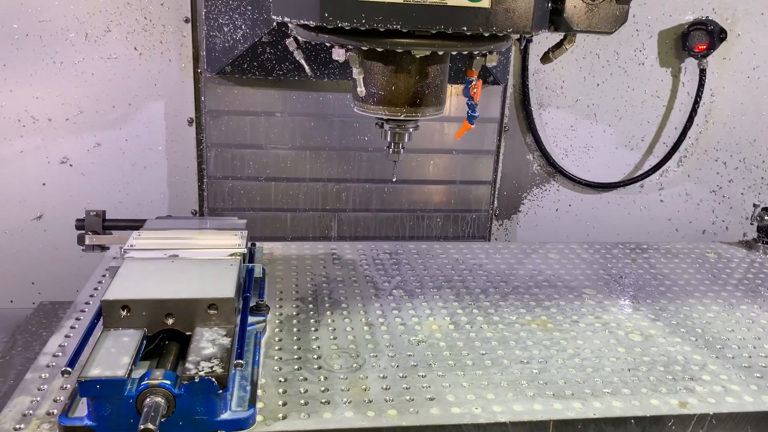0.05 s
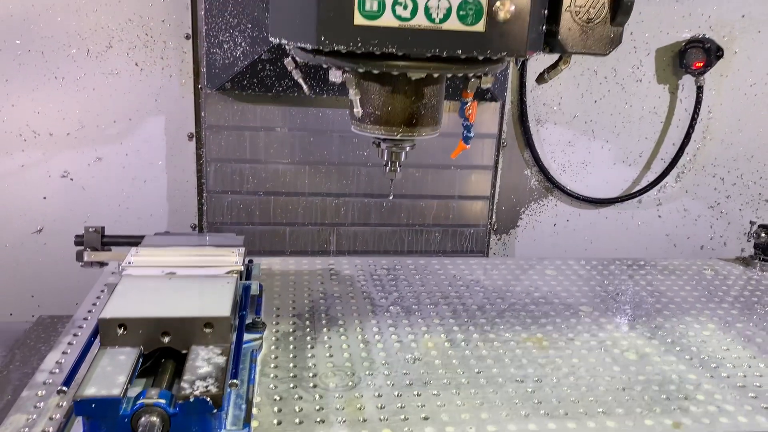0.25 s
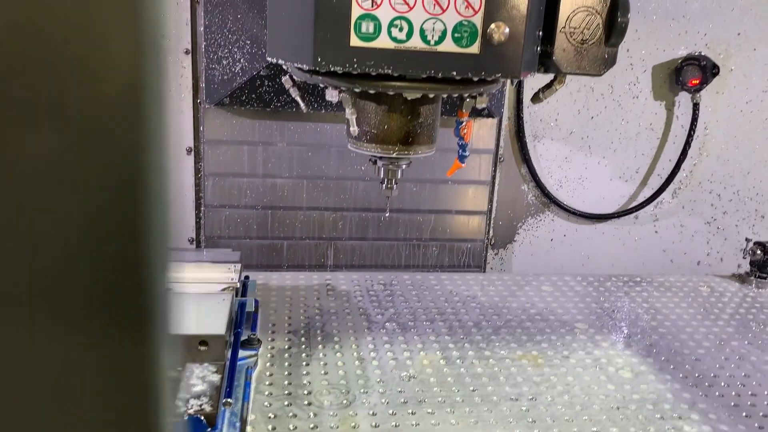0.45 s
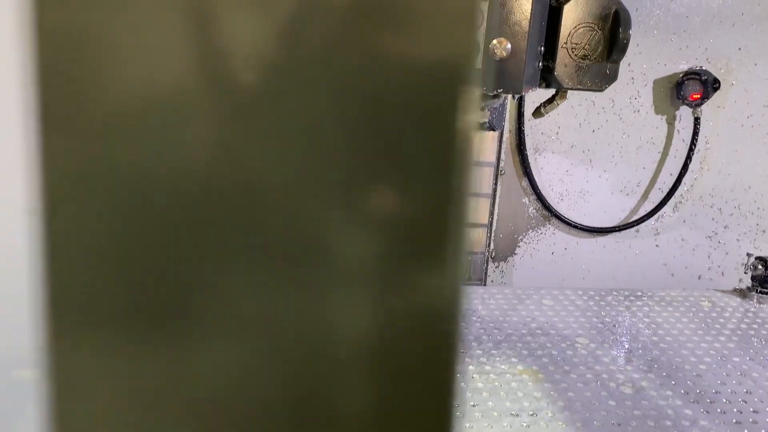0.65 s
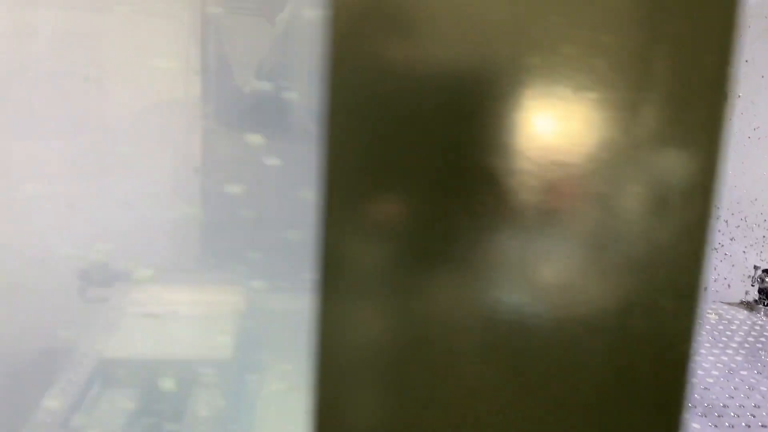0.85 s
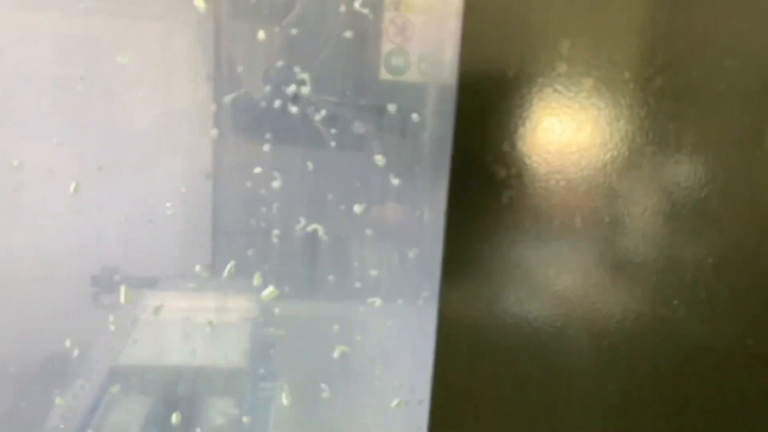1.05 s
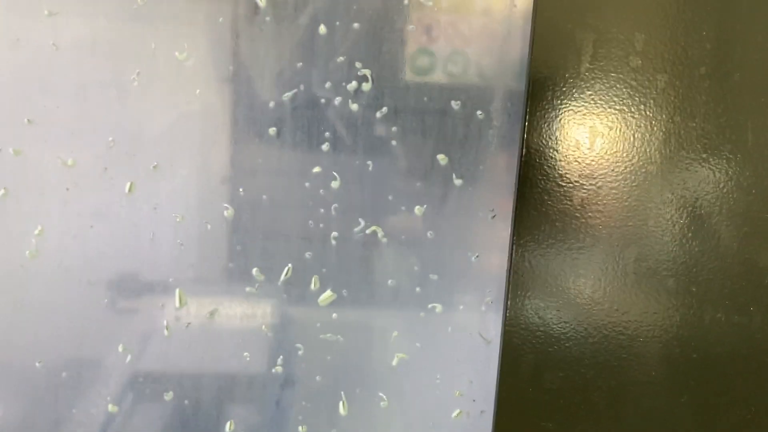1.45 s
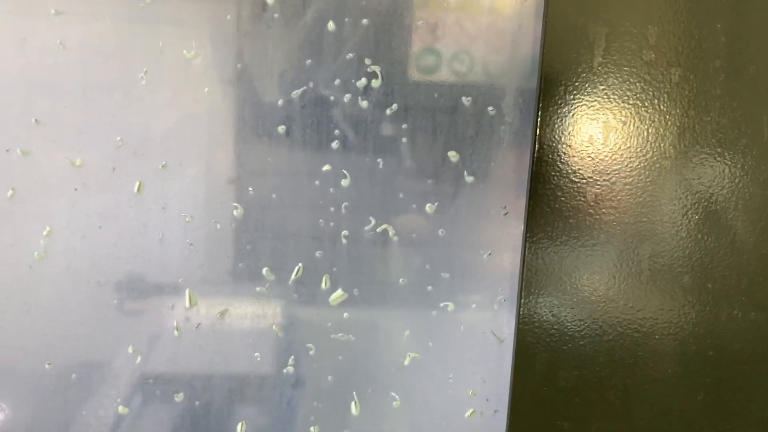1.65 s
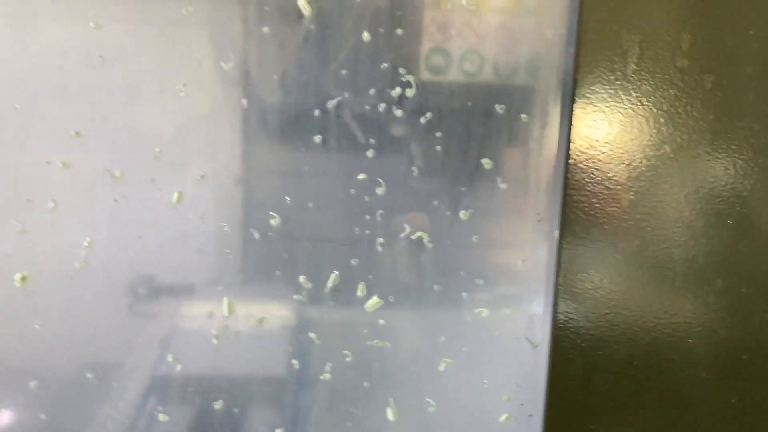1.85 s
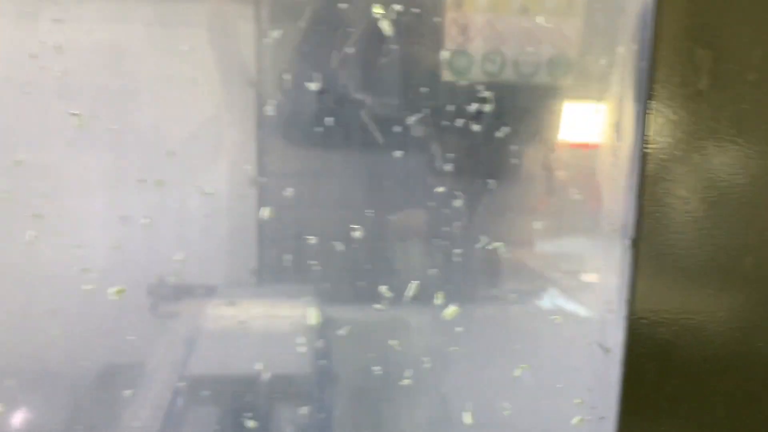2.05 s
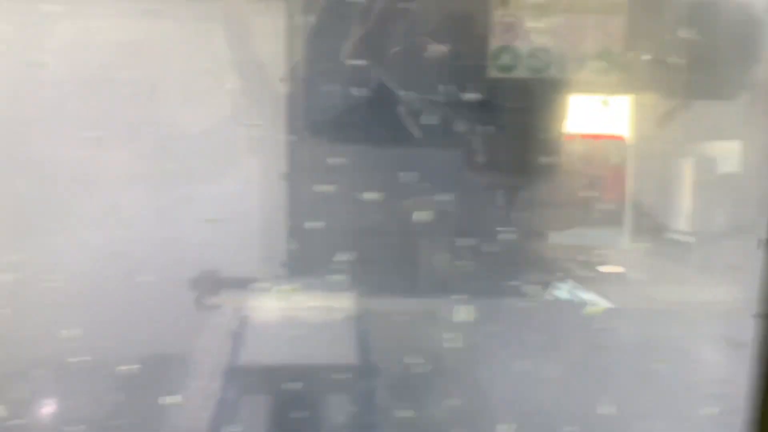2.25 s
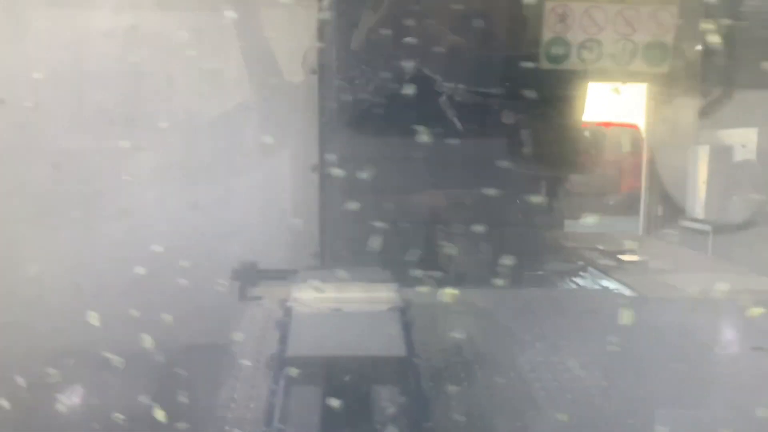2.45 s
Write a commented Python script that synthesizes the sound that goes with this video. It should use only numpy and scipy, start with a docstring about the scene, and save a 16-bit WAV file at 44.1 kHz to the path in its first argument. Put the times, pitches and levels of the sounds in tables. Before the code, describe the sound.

A heavy metal enclosure door rumbles along its track and thuds shut as a machine hums.

```python
"""A machine hums, and a soft thump sounds as the sheet-metal door of its enclosure is gripped.
The hum grows louder while the door rolls: grit and rough spots excite the frame, the enclosure
shudders, the panel flexes in falling tones, and steel clanks on steel. The door shuts with a knock,
a boom and a latch tick, then settles with a few soft thumps. Each impact rings the damped modes
of the body it strikes, and all is heard at a close pair of microphone ports."""
import sys
import numpy as np
from scipy import signal
from scipy.fft import rfft, irfft
from scipy.io import wavfile
from scipy.ndimage import uniform_filter1d

SR = 44100
rng = np.random.default_rng(int(sys.argv[2]) if len(sys.argv) > 2 else 0)


def unload_wav(signal):
    """Save mono or channel-first audio to the path in sys.argv[1] as 16-bit WAV at rate SR, clipped to [-1, 1]."""
    wavfile.write(
        sys.argv[1],
        SR,
        np.round(np.clip(np.atleast_2d(signal).T, -1, 1) * 32767).astype(np.int16),
    )


N = 110250
TIME, BINS = np.arange(N) / SR, np.arange(N // 2 + 1) * SR / N


def amp(db):
    """Amplitude grows tenfold for every 20 dB."""
    return 10 ** (np.asarray(db) / 20)


def at_hz(table, hz, column=1):
    """Interpolation of a table's column on a log-frequency axis."""
    table = np.array(table)
    return np.interp(np.log(hz + 1e-9), np.log(table[:, 0]), table[:, column])


def envelope(curve):
    """Gain over time, linear in decibels between points."""
    return amp(np.interp(TIME, *np.transpose(curve)))


def white():
    """Spectra of two uncorrelated white noises at 0 dB per Hz."""
    return rfft(rng.standard_normal((2, N))) * np.sqrt(SR / 2)


def noise(spectrum):
    """Spectral shaping colours two uncorrelated noises."""
    return irfft(white() * amp(at_hz(spectrum, BINS)), N)


def drift(rate_hz):
    """Low-passed noise gives a random fluctuation of unit variance."""
    slow = irfft(white()[0] / (1 + (BINS / rate_hz) ** 2), N)
    return slow / slow.std()


def impulses(rows):
    """A brief contact acts as an impulse: one for each time and level."""
    clicks = np.zeros(N)
    for s, db in rows:
        clicks[int(s * SR)] += amp(db)
    return clicks


def soften(force, hz):
    """A compliant contact acts as a low-pass filter."""
    return signal.sosfilt(signal.butter(2, min(hz, SR / 3), fs=SR, output="sos"), force + 1e-18)


def excite(force, response):
    """A linear body convolves the force with its impulse response."""
    return signal.fftconvolve(np.atleast_2d(force), np.atleast_2d(response), axes=1)[:, :N]


def modes(table):
    """Distinct modes superpose as damped sinusoids, each falling 60 dB in its T60."""
    t = TIME[:SR]
    return sum((-1) ** k * amp(db - 60 * t / t60) * np.sin(2 * np.pi * hz * t)
               for k, (hz, db, t60) in enumerate(table))


def modal_ripple(depth_db, width_hz=66):
    """Sheet metal responds with random peaks and valleys, at unchanged mean power."""
    span = max(int(width_hz * N / SR), 3)
    ripple = uniform_filter1d(uniform_filter1d(rng.standard_normal(len(BINS)), span), span)
    gain = amp(depth_db * np.clip(ripple / ripple.std(), -2, 1.5) * BINS / (BINS + 1200))
    return gain / np.sqrt(uniform_filter1d(gain ** 2, 10 * span))


def dense_modes(table, ripple_db=0, bands=12):
    """Overlapping modes merge into noise that decays band by band."""
    spectrum = white() * amp(at_hz(table, BINS)) * modal_ripple(ripple_db)
    centres = np.geomspace(40, 16000, bands)
    out = 0
    for hz, pick in zip(centres, np.eye(bands)):
        band = irfft(spectrum * np.interp(BINS, centres, pick), N)[:, :SR]
        out = out + band * amp(-60 * TIME[:SR] / at_hz(table, hz, column=2))
    return out


# Each row: frequency in Hz, rms level in dB before the swell, waver in Hz, share of the swell in dB.
HUM_TONES = [(475.4, -60.5, .9, .85), (571.3, -59.5, 0.65, .72), (633, -53.5, .6, 1.06),
             (1041, -69.5, 0.9, 1.18), (1540, -74, 9.7, 0.69), (1720, -79.5, 1.6, 1.05),
             (1873, -82, 2, 1.3)]
# Fans and pumps, thin hiss, rushing air. Each row: frequency in Hz, level in dB per Hz.
FAN_SPECTRUM = [(25, -90.5), (70, -78), (150, -99.5), (280, -101), (420, -94), (530, -81), (640, -87),
                (730, -96), (1300, -96.5), (1600, -88.5), (1950, -96), (2400, -116), (4500, -121),
                (6500, -113), (8000, -122)]
HISS_SPECTRUM = [(7600, -130), (8200, -93.5), (10000, -97.5), (12000, -102), (16000, -106)]
RUSH_SPECTRUM = [(25, -82), (85, -66), (170, -76.5), (280, -82.5), (500, -82), (1000, -87), (1800, -89),
                 (2800, -99), (6700, -99), (8500, -116), (12000, -135)]
# Each row: time in seconds, gain in dB.
HUM_SWELL = [(0, -6.5), (.12, 0.5), (.21, 1), (.34, 15.5), (1.28, 15), (1.295, 3), (1.47, -2), (2.08, 0),
             (2.14, -6.5), (2.33, 3.5), (2.5, 0)]
HISS_GAIN = [(0, 0.5), (.17, 2), (.19, 9.5), (.24, 9.5), (.33, 0), (1.006, 3.5), (1.3, -1), (1.6, 1.5),
             (2.5, 1)]
RUSH_GAIN = [(0, -10.5), (.1, -5), (.21, -4), (1.3, -9), (1.38, -34), (1.75, -35), (1.92, -12.5),
             (2.2, -32.5), (2.26, -5), (2.34, 2), (2.41, -2.5), (2.5, -6)]


def machine(waver_db=.77):
    """Tones, slightly modulated in pitch and level, superpose on the broadband noise of fans and air."""
    hum = 0
    for hz, db, waver_hz, share in HUM_TONES:
        phase = 2 * np.pi * np.cumsum(hz + waver_hz * drift(7.6)) / SR
        gain = np.sqrt(2) * amp(db + waver_db * drift(7.9)) * envelope(HUM_SWELL) ** share
        hum = hum + gain * np.array([np.sin(phase), np.cos(phase)])
    fans = noise(FAN_SPECTRUM)
    hiss = noise(HISS_SPECTRUM) * envelope(HISS_GAIN)
    rush = noise(RUSH_SPECTRUM) * envelope(RUSH_GAIN)
    return hum + fans + hiss + rush


# Each row: start in seconds, level in dB, contact cutoff in Hz.
THUMPS = [(.076, 1, 750), (1.497, -6, 950), (1.781, -10, 400), (1.825, -5, 229)]
# The door's dull ring. Each row: frequency in Hz, initial level in dB per Hz, T60 in seconds.
THUD_RING = [(25, -68, .2), (70, -59.5, 0.23), (130, -66.5, 0.13), (278, -72, 0.071), (554, -66, 0.095),
             (1500, -83, 0.13), (4000, -115, .1)]


def thumps():
    """Soft contacts excite mainly low modes as the door is gripped and as it settles."""
    force = sum(soften(impulses([(s, db)]), hz) for s, db, hz in THUMPS)
    return excite(force, dense_modes(THUD_RING))


def travel(start_s=.2138, stop_s=1.2805, attack_s=.0049, release_s=.024):
    """A gate: 1 while the door moves, 0 while it rests."""
    return np.clip((TIME - start_s) / attack_s, 0, 1) * np.clip(1 - (TIME - stop_s) / release_s, 0, 1) ** 2


def frame_ring(t60):
    """The frame's impulse response at one point is exponentially decaying noise."""
    return rng.standard_normal((2, SR // 2)) * amp(-60 * TIME[:SR // 2] / t60)


# Rollers on the track. Each row: frequency in Hz, level in dB per Hz.
ROLL_SPECTRUM = [(25, -72.5), (55, -59), (150, -58), (550, -60.5), (750, -66), (1200, -70), (2000, -75),
                 (3000, -80), (5200, -82), (7500, -91.5), (9000, -99), (13000, -114)]
# Each row: time in seconds, gain in dB.
ROLLER_LOAD = [(.22, 0.5), (.43, 0), (.56, -2), (.62, 0.5), (.72, -.5), (.97, -1.5), (1.06, 1.5),
               (1.2, -3.5), (1.28, -2.5)]
# Each row: frequency in Hz, level in dB, T60 in seconds.
PANEL_MODES = [(56.6, -4.5, 0.26), (89.4, -2, 0.27), (117.1, 1.5, 0.35), (175, -1.5, 0.35),
               (239.4, -9, 0.14), (381, -14, 0.17)]


def rollers(count=5, grit_per_s=1500, spread_db=3.5, drone_db=-39.5, surge_db=1.1):
    """Crushed grit is a random impulse train that rattles the frame and drives the panel's modes."""
    sizes = amp(spread_db * np.minimum(rng.exponential(1, (count, N)), 4))
    signs = rng.choice([-1, 1], (count, N))
    grit = sizes * signs * (rng.random((count, N)) < grit_per_s / count / SR)
    frame = sum(excite(roller, frame_ring(t60=.072)) for roller in grit)
    rattle = irfft(rfft(frame / frame.std()) * amp(at_hz(ROLL_SPECTRUM, BINS)) * np.sqrt(SR / 2), N)
    drone = excite(grit.sum(axis=0) * travel(), modes(PANEL_MODES))
    rolling = rattle + amp(drone_db) * drone / drone.std()
    return rolling * envelope(ROLLER_LOAD) * amp(surge_db * drift(15))


# Each row: frequency in Hz, level in dB per Hz.
SHUDDER_SPECTRUM = [(25, -60), (50, -49), (95, -46), (130, -54), (200, -68.5), (400, -83), (2000, -140)]
# Each row: time in seconds, gain in dB.
SHUDDER_GAIN = [(.21, -44), (.36, -13.5), (.92, -10), (1.0, -14), (1.04, -1), (1.13, -0.5), (1.29, -4.5),
                (1.33, -28), (1.47, -28), (1.56, -41.5), (1.76, -44), (1.81, -21), (2.02, -30.5),
                (2.12, -46)]


def shudder():
    """Random vibration of the enclosure radiates a deep rumble, strongest as the door shuts."""
    return noise(SHUDDER_SPECTRUM) * envelope(SHUDDER_GAIN)


# Each row: start in seconds, peak level in dB, centre frequency in Hz.
TRACK_BUMPS = [(.248, -23, 300), (.285, -26, 620), (.302, -25, 700), (.335, -26.5, 330),
               (.598, -29.5, 1400), (.609, -20.5, 640)]


def bumps():
    """Each impact of a roller on a rough spot excites an octave band of the frame's modes."""
    out = 0
    for s, db, hz in TRACK_BUMPS:
        octave = signal.butter(2, [hz / np.sqrt(2), hz * np.sqrt(2)], "band", fs=SR, output="sos")
        ring = signal.sosfilt(octave, frame_ring(t60=.07))
        out = out + excite(impulses([(s, db)]), ring / np.abs(ring).max(axis=1, keepdims=True))
    return out


# Each row: start in seconds, level in dB, first and final pitch in Hz, T60 in seconds.
PANEL_FLEXES = [(.388, -23, 430, 230, 0.16), (.626, -18.5, 149, 106, .2), (1.019, -15.5, 185, 74, 0.303),
                (1.205, -18, 160, 99.5, .15), (1.482, -36.5, 233, 48, 0.19), (1.778, -43, 450, 82, .16),
                (2.102, -46, 1350, 758, 0.068)]


def flexes(swell_s=.006, sag_share=.07, flutter_depth=.4):
    """Bending waves spread through the flexing panel, the treble arriving first: its fluttering tone sinks in
    pitch and dies."""
    out = 0
    for s, db, start_hz, end_hz, t60 in PANEL_FLEXES:
        age = np.maximum(TIME - s, 0)
        hz = end_hz + (start_hz - end_hz) * np.exp(-age / (sag_share * t60))
        swing = np.sin(2 * np.pi * np.cumsum(hz * (age > 0)) / SR)
        flutter = 1 + flutter_depth * drift(start_hz / 2)
        gain = amp(db - 60 * age / t60) * (1 - np.exp(-age / swell_s))
        out = out + gain * swing * flutter
    return out


# Each row: start in seconds, level in dB.
STEEL_STRIKES = [(.7885, -5), (.792, 1), (.798, -2), (.808, -5.5), (.828, -12.5)]
# Each row: frequency in Hz, level in dB, T60 in seconds.
STEEL_MODES = [(375, -36, 0.275), (493.7, -35, 0.28), (555, -38, .25), (1056, -40, .3), (1110, -38, .32),
               (1780, -43, .35), (1816, -40, .42), (2043, -39, 0.39), (2147, -34.5, 0.36),
               (2487, -39.5, .38), (2730, -41, 0.43), (2907, -43, .4), (3610, -44, .4), (3960, -41, 0.31),
               (5310, -41, .26), (5660, -41, .26), (6050, -41, 0.18), (6450, -39.5, .26), (7044, -43, .22)]
# The first strike's bright snap, and the dense modes of every strike.
# Each row: frequency in Hz, initial level in dB per Hz, T60 in seconds.
SNAP_RING = [(1000, -94, .05), (4000, -73, .06), (7000, -66.5, .07), (11000, -74, .06), (16000, -81, .06)]
CLASH_RING = [(199, -75.5, .3), (440, -60, 0.26), (850, -74.5, 0.28), (2000, -68.5, 0.77),
              (4000, -69.5, 0.5), (6430, -70.5, 0.2), (9600, -74.5, 0.26), (10700, -83, .22),
              (11600, -72, .26), (12500, -88.5, .22), (15500, -84.5, 0.24)]


def clank(uneven_db=2, neighbour_count=3, cluster_hz=32.4, neighbour_db=-7):
    """Steel strikes steel in a quick run, exciting clusters of close modes that beat together."""
    out = excite(impulses(STEEL_STRIKES[:1]), dense_modes(SNAP_RING))
    neighbours = [(hz + cluster_hz * rng.uniform(-1.02, 1), db + neighbour_db, t60)
                  for hz, db, t60 in STEEL_MODES for _ in range(neighbour_count)]
    rings = np.array([modes([mode]) for mode in STEEL_MODES + neighbours])
    for strike in STEEL_STRIKES:
        strengths = amp(uneven_db * rng.standard_normal(len(rings))) * rng.choice([-1, 1], len(rings))
        out = out + excite(impulses([strike]), strengths @ rings) * [[1], [-.5]]  # a little to the right
    return out + excite(impulses(STEEL_STRIKES), dense_modes(CLASH_RING, ripple_db=2.5))


# Each row: start in seconds, level in dB.
BUFFER_KNOCKS = [(1.016, 1.5)]
# Each row: frequency in Hz, initial level in dB per Hz, T60 in seconds.
BUFFER_RING = [(150, -54.5, 0.18), (600, -60.5, 0.081), (1310, -57.5, .07), (2200, -75, .08),
               (5000, -99, .1), (9000, -120, .1)]
# Each row: frequency in Hz, level in dB, T60 in seconds.
BUFFER_MODES = [(1038, -23, 0.037), (1307, -23, 0.033), (1490, -26, 0.027)]


def knock():
    """The door meets its buffer, whose heavily damped modes give a short, woody clack."""
    contact = impulses(BUFFER_KNOCKS)
    clack = excite(soften(contact, hz=2200), modes(BUFFER_MODES)) * [[1], [0]]  # centred
    return excite(contact, dense_modes(BUFFER_RING)) + clack


# Each row: frequency in Hz, initial level in dB per Hz, T60 in seconds.
LATCH_RING = [(400, -64, .1), (1490, -62, 0.12), (3000, -75, 0.26), (4800, -72.5, .04),
              (5640, -59.5, 0.049), (6840, -76, .04), (8500, -112, .04)]


def latch(start_s=1.051):
    """The latch snaps in: one impulse rings its dense, fast-decaying modes as a tick."""
    return excite(impulses([(start_s, 0)]), dense_modes(LATCH_RING))


# Each row: start in seconds, level in dB.
PANEL_JOLTS = [(1.076, -23), (1.123, -26.5)]


def jolts():
    """Soft jolts leave the panel booming in free vibration at its low modes."""
    return excite(soften(impulses(PANEL_JOLTS), hz=220), modes(PANEL_MODES))


# Each row: frequency in Hz, left-right coherence from 0 to 1.
PORT_COHERENCE = [(700, 1), (1000, 0.99), (1400, 0.27), (3000, 0.44), (4300, 1), (5600, 0.98), (6800, 1),
                  (16000, 1)]
# Each row: frequency in Hz, phase lead of the left port in radians.
PORT_LEAD = [(0, 0), (1100, 0), (2400, 3), (3500, 1.5), (4700, 3), (6700, 6), (9000, 9.5), (13200, 16),
             (16000, 20.5)]


def ports(sound):
    """Shared and diffuse sound mix at two ports: coherent in the bass, the left leading in the treble."""
    shared, diffuse = rfft(sound)
    coherence = np.clip(at_hz(PORT_COHERENCE, BINS), 0, 1)
    lead = np.interp(BINS, *np.transpose(PORT_LEAD))
    sides = np.array([[1], [-1]])
    mixed = np.sqrt((1 + coherence) / 2) * shared + sides * np.sqrt((1 - coherence) / 2) * diffuse
    return irfft(mixed * np.exp(.5j * sides * lead), N)


def scene():
    """The sources superpose in two rows, shared and diffuse; the moving door sounds until pressed home."""
    moving_door = (rollers() + bumps() + clank() + latch() + jolts()) * travel()
    return ports(moving_door + knock() + flexes() + shudder() + thumps() + machine())


def record(dry):
    """Band limiting removes the deepest bass and the highest treble."""
    dry = signal.sosfilt(signal.butter(4, 30, "high", fs=SR, output="sos"), dry)
    return signal.sosfilt(signal.ellip(12, .1, 80, 15900, fs=SR, output="sos"), dry)


dry = scene()
out = record(dry)
unload_wav(out)
```